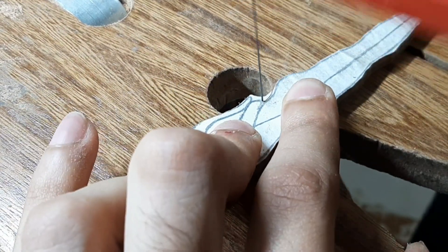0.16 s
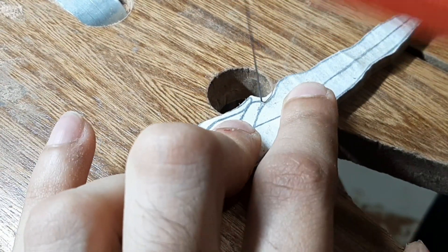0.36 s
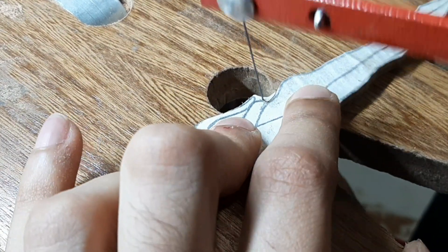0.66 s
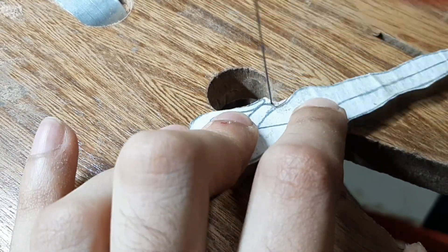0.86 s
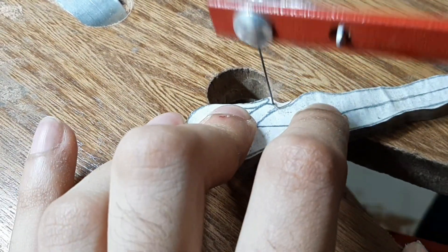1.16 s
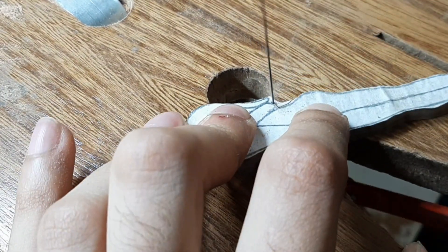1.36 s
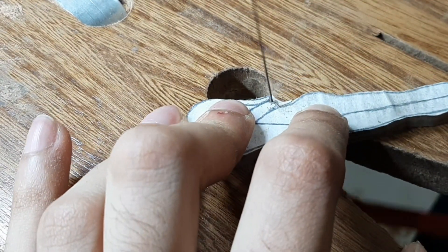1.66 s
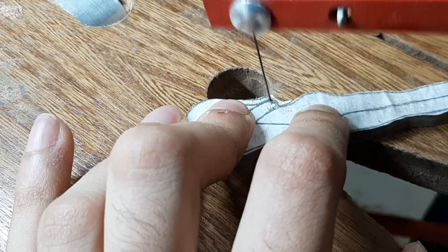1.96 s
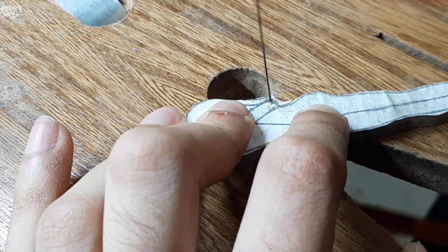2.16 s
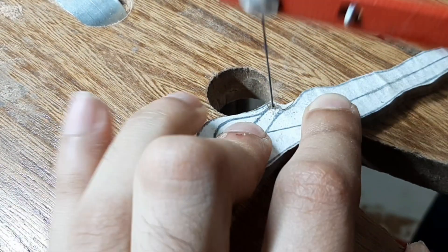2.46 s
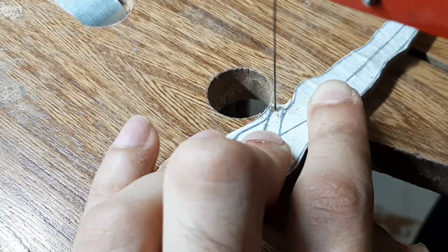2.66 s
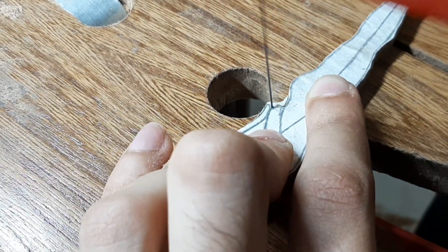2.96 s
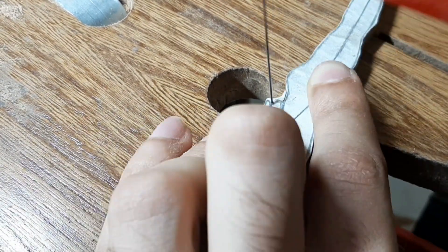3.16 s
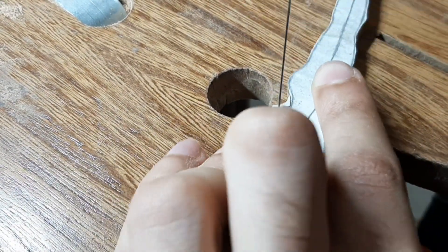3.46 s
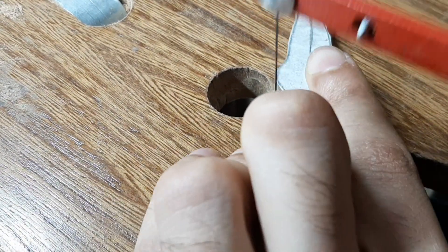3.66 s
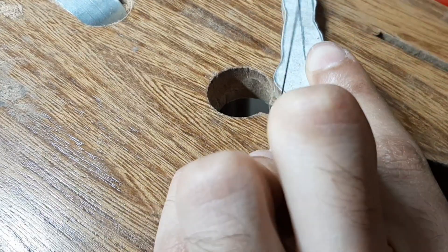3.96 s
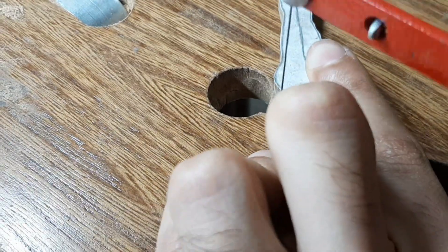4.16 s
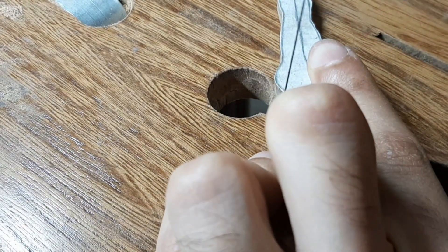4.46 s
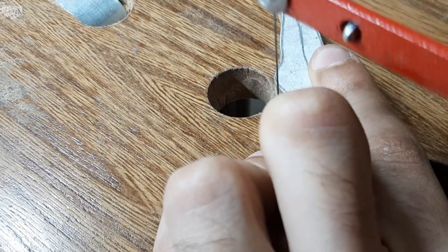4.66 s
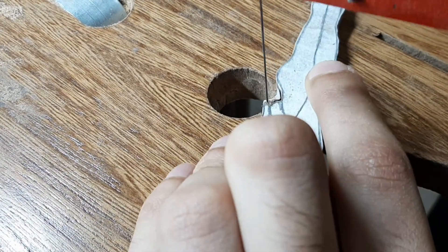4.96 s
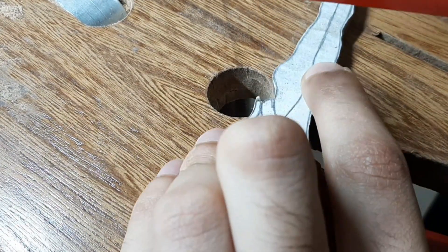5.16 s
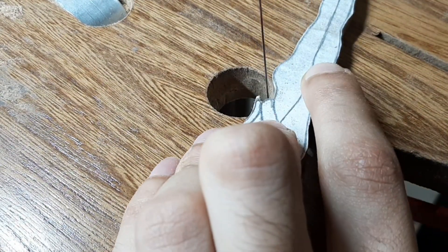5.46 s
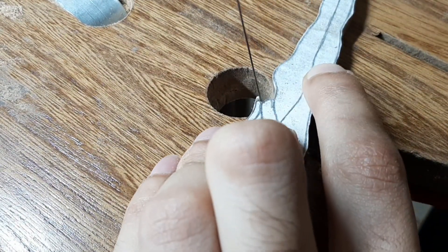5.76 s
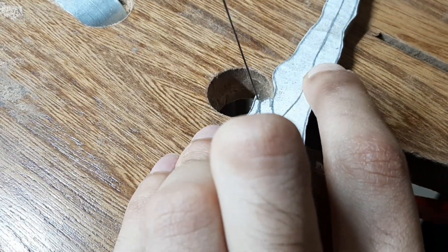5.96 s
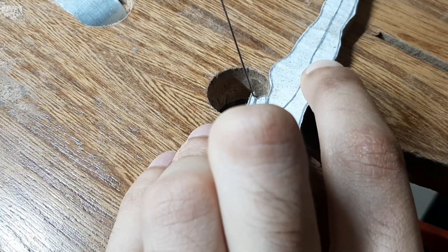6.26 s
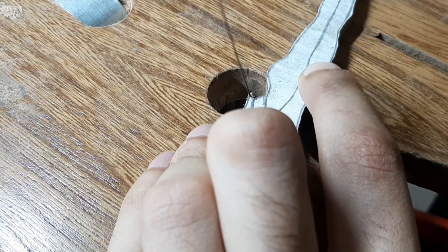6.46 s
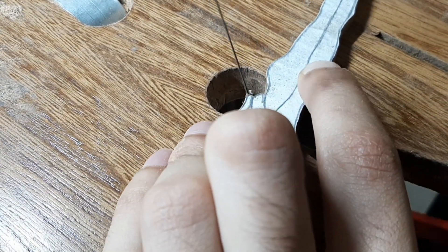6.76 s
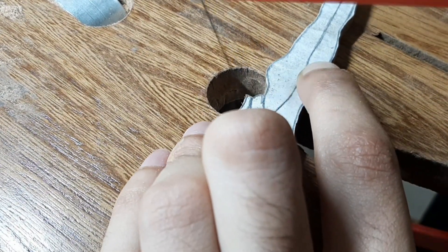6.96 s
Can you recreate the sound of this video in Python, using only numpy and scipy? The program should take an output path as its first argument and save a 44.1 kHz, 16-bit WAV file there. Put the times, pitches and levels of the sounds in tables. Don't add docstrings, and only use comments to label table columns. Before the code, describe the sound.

A fine hand saw rasps quickly through thin wood on a bench, with woody drumming, a few sharp knocks and near-silent pauses.

```python
import sys
import numpy as np
from scipy import signal
from scipy.fft import rfft, irfft, next_fast_len
from scipy.io import wavfile
from scipy.ndimage import uniform_filter1d

SR = 44100
rng = np.random.default_rng(int(sys.argv[2]) if len(sys.argv) > 2 else 0)


def voltage_ratio(decibels):
    exponent = np.asarray(decibels, float) / 20
    return 10 ** exponent


def pcm_store(signal):
    levels = np.round(np.clip(np.atleast_2d(signal), -1, 1) * 32767)
    wavfile.write(sys.argv[1], SR, levels.astype(np.int16).T)


N = 313992
T = np.arange(N) / SR

HOLDS = [
    0,
    1.04,
    2.4,
    5.5,
]
# (time [s], peak [dB], brightness [dB per octave], tail length [factor])
KNOCKS = [(0.162, -47, -6, 0.95), (1.064, -39.5, -4, 1), (1.838, -36, 4, 0.59), (1.962, -37.5, 3.5, 0.97),
          (2.837, -51, -1, 0.56), (3.35, -23, -1, 0.3), (3.514, -35, -2.5, 0.87), (5.117, -38, 1.5, 0.88),
          (5.149, -19, 3.5, 0.79), (5.804, -38.5, -1.5, 1), (6.396, -39, 21, 0.62), (7.072, -19, 6, 0.77)]


def evened(x):
    return x / np.sqrt(np.mean(x ** 2) + 1e-20)


def read(points, hz):
    f, value = np.transpose(points)
    return np.interp(np.log(hz + 1), np.log(f + 1), value)


def colour(x, points):
    size = next_fast_len(N)
    gain = voltage_ratio(read(points, np.fft.rfftfreq(size, 1 / SR)))
    return irfft(rfft(x, size) * gain, size)[..., :N]


def hold_at(times):
    return np.searchsorted(HOLDS, times, "right") - 1


def ring(x, modes, wander=0., step=.048):
    out, hold = np.zeros_like(x), hold_at(T)
    for hz, width, *db in modes:
        r, w = np.exp(-np.pi * width / SR), 2 * np.pi * hz / SR
        drift_db = wander * np.clip(rng.standard_normal(600), -2, 2)
        drift = np.interp(T, np.arange(600) * step, voltage_ratio(drift_db))
        gain = voltage_ratio(np.resize(db, len(HOLDS)))[hold] * drift
        out += gain * (1 - r) * signal.lfilter([1, 0, -1], [1, -2 * r * np.cos(w), r * r], x)
    return out


def add(mix, s, sound):
    part = mix[:, round(s * SR):][:, :sound.shape[1]]
    part += sound[:, :part.shape[1]]


def patches(shape, bins, frames):
    field = uniform_filter1d(uniform_filter1d(rng.standard_normal(shape), bins, 0), frames, 1)
    return evened(uniform_filter1d(field, bins, 0))


def hiss(floor_db=-90):
    return voltage_ratio(floor_db) * rng.standard_normal((2, N))


def shake_level(bite, db, follow, lag, press, column, slope):
    # (time [s], pressure [dB])
    pressing = [(0, 12.5), (.13, -19), (.33, 3.5), (.6, 1.5), (2.0, -1), (2.33, -4.5), (2.7, -10),
                (3.17, 2.5), (3.6, -2.5), (4.9, -1), (5.05, -7.5), (5.55, -14.5), (5.8, -3), (6.17, -17.5),
                (6.3, -3), (6.55, -2), (7.12, 11)]
    # (peak time [s], boom [dB], drumming [dB], swell [dB per s], fade [dB per s])
    shoves = [(0.209, -50, -43.5, 248, 128), (1.2, -47, -44.5, 122, 126.5), (2.72, -54.5, -61, 60, 400),
              (2.882, -50, -42.5, 281, 254), (3.359, -46, -34, 700, 113), (3.56, -51.5, -69, 72, 157),
              (4.83, -59, -55.5, 300, 117), (5.161, -38, -31.5, 599, 212.5), (5.75, -65.5, -82, 500, 500),
              (5.811, -50.5, -49.5, 798, 108), (6.4, -57, -59, 400, 132), (6.53, -50.5, -51, 150, 92),
              (6.89, -66, -54, 300, 102), (7.082, -37, -27, 704, 237)]
    keep = np.exp(-1 / (lag * SR))
    bite_db = 10 * np.log10(signal.lfilter([1 - keep], [1, -keep], bite) + 1e-13)
    press_db = press * np.interp(T, *np.transpose(pressing))
    power = voltage_ratio(2 * (db + follow * (bite_db + 45) + press_db))
    at = T.copy()
    for blow, *_ in KNOCKS:
        at[(T > blow - .03) & (T < blow)] = blow - .03
    for row in shoves:
        near = slice(max(round((row[0] - .3) * SR), 0), round((row[0] + .6) * SR))
        late = at[near] - row[0]
        fall_db = slope * np.where(late < 0, -row[3] * late, row[4] * late)
        power[near] += voltage_ratio(2 * (row[column] - fall_db))
    return np.sqrt(power)


def bench(bite, wide_db=-2.0, hollow_db=3.5):
    # (frequency [Hz], width [Hz], level [dB])
    boom_modes = [(108.5, 21, 0.5), (143.2, 7.5, 1.5), (224.7, 1.9, -0.5)]
    # (frequency [Hz], level [dB per Hz])
    wood = [(24, -60.5), (40, -45), (107, 2.5), (180, -9), (230, 11.5), (293, -26), (885, -7.5), (1190, -7),
            (1340, -5), (2290, -4), (2500, -16.5), (3250, -43.5), (5500, -120)]
    # (frequency [Hz], width [Hz], level [dB])
    hollow = [(400, 58, 6), (484, 35, 7.5), (601, 45, 4), (700, 89, 7.5), (764, 16, 4.5), (1023, 21, 11)]
    shake, rattle = rng.standard_normal((2, 2, N))
    boom = evened(ring(shake, boom_modes, wander=1.7))
    boom += voltage_ratio(wide_db) * evened(colour(shake, wood[:5] + [(400, -78.0)]))
    drum = evened(colour(rattle, [(200, -66.0)] + wood[4:]))
    drum += voltage_ratio(hollow_db) * evened(ring(rattle, hollow, wander=4.8))
    boom_level = shake_level(bite, -56, follow=0.35, lag=0.025, press=1, column=1, slope=0.56)
    drum_level = shake_level(bite, -60.5, follow=0.39, lag=0.006, press=0.73, column=2, slope=1)
    return boom_level * evened(boom) + drum_level * evened(drum)


def hums(width=92.0):
    # (time [s], level [dB], frequency [Hz])
    tracks = [
        [(4.38, -61.5, 1040), (4.54, -64.5, 985), (4.575, -45.5, 1090), (4.67, -66, 1020), (4.7, -55, 986),
         (4.83, -66, 1000), (5.02, -65, 1094)],
        [(5.86, -50, 458), (5.91, -60.5, 463), (5.96, -68, 419), (6.04, -59.5, 416), (6.14, -85, 444)],
    ]
    out, r = np.zeros((2, N)), np.exp(-np.pi * width / SR)
    for rows in tracks:
        s, db, hz = np.transpose(rows)
        t = np.arange(s[0], s[-1], 1 / SR)
        slow = signal.lfilter([1], [1, -2 * r, r * r], rng.standard_normal((2, 2, len(t))))
        turning = np.exp(2j * np.pi * np.cumsum(np.interp(t, s, hz)) / SR)
        tone = ((slow[0] + 1j * slow[1]) * turning).real
        level = voltage_ratio(np.interp(t, s, db) + 4.0) * signal.windows.tukey(len(t), .15)
        add(out, s[0], level * evened(tone))
    return out


def pings():
    # (time [s], peak [dB], time to fade by 60 dB [s])
    touches = [
        (5.6088, -55, 0.36),
        (5.653, -63.5, 0.097),
    ]
    # (frequency [Hz], width [Hz], level [dB])
    blade_modes = [(2730, 270, -32), (3690, 120, -1.5), (4670, 390, -22), (7220, 280, -1.5),
                   (10500, 290, -1.5)]
    out, t = np.zeros((2, N)), np.arange(SR // 4) / SR
    for s, db, t60 in touches:
        strength = (t < .006) + .5 * voltage_ratio(-60 * t / t60)
        add(out, s, voltage_ratio(db + 12) * rng.standard_normal((2, len(t))) * strength)
    return ring(out, blade_modes)


def snags(ping_t60=0.0025):
    # (time [s], peak [dB], pitch [Hz], rattle after it [dB], rattle time to fade by 60 dB [s])
    events = [
        (0.1165, -31, 9360, -21, 0.053),
        (1.024, -27.5, 5870, -47, 0.16),
        (3.1856, -62, 9700, -1, 0.13),
        (3.3484, -28.5, 10200, -10.5, 0.048),
        (3.366, -21, 5280, -30, 0.17),
        (3.517, -33.5, 4600, -18, 0.13),
        (4.994, -68, 9460, -22, 0.2),
        (5.1163, -16.5, 9700, -15.5, 0.21),
        (7.0116, -32, 5140, -10, 0.13),
    ]
    out, t = np.zeros((2, N)), np.arange(SR // 3) / SR
    for s, db, hz, rattle_db, rattle_t60 in events:
        noise = rng.standard_normal((2, len(t)))
        ping = signal.lfilter(*signal.iirpeak(hz, 4.0, SR), noise * voltage_ratio(-60 * t / ping_t60))
        fading = voltage_ratio(rattle_db - 60 * (t / rattle_t60) ** 1.38)
        rattle = signal.lfilter(*signal.iirpeak(hz, .6, SR), noise * fading)
        add(out, s, voltage_ratio(db) * (2.4 * ping + 1.43 * rattle))
    return out


def catches(boost_db=4.5, spread=1.8):
    # (time [s], peak [dB], frequency [Hz], length [s])
    swells = [(0.426, -46.5, 1232, 0.018), (0.427, -36, 2515, 0.016), (0.431, -54, 3760, 0.034),
              (0.56, -42, 2990, 0.016), (0.564, -51, 3870, 0.024), (0.686, -47, 2480, 0.025),
              (0.808, -45.5, 1227, 0.024), (0.817, -44, 3830, 0.016), (1.081, -48, 2493, 0.018),
              (1.199, -45, 714, 0.015), (1.205, -49, 2480, 0.022), (1.213, -45, 2990, 0.016),
              (1.339, -52, 1210, 0.029), (1.342, -43, 2880, 0.016), (1.348, -53, 3750, 0.029),
              (1.458, -43.5, 2480, 0.015), (1.464, -47, 4610, 0.015), (1.551, -45.5, 3830, 0.018),
              (1.59, -43.5, 2533, 0.016), (1.865, -49.5, 3950, 0.018), (2.362, -50, 2570, 0.015),
              (2.864, -46, 974, 0.018), (2.865, -78, 2570, 0.016), (2.891, -63, 2820, 0.02),
              (3.273, -51, 2540, 0.031), (3.336, -58, 2560, 0.036), (3.416, -41, 4590, 0.018),
              (3.432, -45, 1107, 0.027), (3.521, -46, 686, 0.015), (4.446, -51, 1900, 0.018),
              (4.447, -52, 5060, 0.024), (4.45, -43, 2990, 0.024), (4.56, -42, 2440, 0.015),
              (4.568, -51.5, 2150, 0.025), (4.693, -45, 2930, 0.015), (4.705, -56.5, 986, 0.036),
              (4.805, -49, 2526, 0.016), (4.814, -48.5, 2117, 0.016), (5.208, -44, 436, 0.06),
              (6.404, -55, 686, 0.027), (6.412, -48, 2240, 0.02), (6.415, -43.5, 3044, 0.02),
              (6.546, -40, 1525, 0.025), (6.548, -46, 2390, 0.02), (6.659, -44.5, 2390, 0.022),
              (6.891, -47, 2484, 0.016), (6.999, -53, 1214, 0.022), (7.0, -46, 3050, 0.018)]
    out = np.zeros((2, N))
    for (s, db, hz, length), phase in zip(swells, rng.random((len(swells), 2, 1))):
        t = np.arange(0, spread * length, 1 / SR)
        tone = np.hanning(len(t)) * np.sin(2 * np.pi * (hz * t + phase))
        add(out, s - t[-1] / 2, voltage_ratio(db + boost_db) * tone)
    return out


def knocks(plank_db=10.0, blow_db=-2.0, rise=0.00013):
    # (frequency [Hz], level [dB per Hz])
    blow_colour = [(35, -45), (60, -19), (390, -4.5), (895, -24.5), (1010, -9), (1330, -20), (2980, -12.5),
                   (5950, -35.5), (11600, -51), (15000, -55)]
    # (frequency [Hz], width [Hz], level [dB])
    plank = [(216, 16, 6.5), (704, 120, 7.5), (1000, 10, 2), (1152, 22, -5.5), (1350, 17, -14.5),
             (3080, 63, -12), (3720, 46, -10)]
    # (frequency [Hz], time to fade by 60 dB [s])
    shop = [(80, 0.35), (210, 0.38), (560, 0.5), (1470, 0.36), (3880, 0.19), (10200, 0.25)]
    out, t = np.zeros((2, N)), np.arange(SR // 2) / SR
    for s, db, bright_db, tail in KNOCKS:
        hz, frames, z = signal.stft(rng.standard_normal((2, len(t))), SR, nperseg=256)
        shape = read(blow_colour, hz) + bright_db * np.log2(hz / 1000 + 0.055)
        z *= voltage_ratio(shape[:, None] - 60 * frames / (tail * read(shop, hz))[:, None])
        sound = signal.istft(z, SR, nperseg=256)[1][:, :len(t)]
        sound *= (1 - np.exp(-t / rise)) * (1 + voltage_ratio(blow_db) * np.exp(-t / 0.0013))
        sound /= np.std(sound[:, :800])
        sound -= 4.0 * np.sin(2 * np.pi * 1300. * t) * np.exp(-t / .0004)
        add(out, s, voltage_ratio(db - 19.0) * sound)
    return out * 2.15 + voltage_ratio(plank_db) * ring(out, plank)


def struck(rise=0.00063):
    # (frequency [Hz], peak [dB], time to fade by 60 dB [s])
    blows = [
        (3.3495, [(226, -38.5, 0.36), (484, -44, 0.39), (700, -38, 0.12), (759, -29.5, 0.16), (1028, -35, 0.11), (1174, -34, 0.23), (1421, -45, .2), (2175, -47, .1)]),
        (3.514, [(674, -38, 0.08), (473, -37, .08), (1210, -49, 0.087)]),
        (5.1162, [(9600, -11, .011), (13400, -15, .008), (6800, -20, .008), (15000, -20, .006)]),
        (5.804, [(232.6, -46, 0.35), (592, -43.5, .1), (2390, -39, 0.045)]),
        (5.117, [(1180, -31, 0.21), (1520, -36, .15), (1890, -38, .15), (2690, -41, .1)]),
        (5.149, [(404, -40, 0.45), (692, -24.5, .09), (783, -27.5, 0.11), (1000, -30.5, 0.29), (1421, -46.5, 0.19), (1900, -36.5, .12), (2492, -43.5, 0.18), (3850, -43, 0.075)]),
        (7.0732, [(231, -30.5, 0.37), (600, -21.5, 0.11), (770, -34, 0.12), (1017, -43.5, 0.32), (2390, -28.5, 0.069), (2724, -20, 0.081), (2929, -12, 0.057), (3849, -40, .2)]),
    ]
    out, t = np.zeros((2, N)), np.arange(SR // 2) / SR
    for s, modes in blows:
        tone = sum(voltage_ratio(db - 60 * t / t60) * np.sin(2 * np.pi * hz * t) for hz, db, t60 in modes)
        add(out, s, np.outer([1, -1], tone * (1 - np.exp(-t / rise))))
    return out


def half_strokes():
    # (cut slows down over [s], return is fastest at [share of the cycle],
    # return speeds up over [share], rest at the turn [s], return ring [dB])
    grips = [
        (0.021, 0.76, 1, 0.0017, 7),
        (0.036, 0.87, 0.49, 0.0014, -0.5),
        (0.026, 0.73, 0.4, 0.0069, 0),
        (0.023, 0.87, 0.73, 0.0084, 5),
    ]
    # (time of top speed [s], bite
    # [dB], speeding up [s], slowing down [s], ring [dB])
    loose = [(2.805, -53, 0.03, 0.031, 1.5), (2.866, -45, 0.048, 0.047, 7.5),
             (2.95, -52.5, 0.027, 0.01, 1.5), (3.031, -52, 0.016, 0.023, 2),
             (3.101, -56.5, 0.028, 0.043, 3), (3.262, -44.5, 0.041, 0.037, 0),
             (3.349, -46.5, 0.052, 0.06, 6), (3.424, -30.5, 0.024, .021, -3),
             (3.523, -47, 0.051, 0.0045, 1.5), (3.54, -43.5, 0.0058, 0.046, -1),
             (3.648, -51.5, .057, 0.013, -4), (5.68, -83, 0.094, 0.059, 9.5),
             (5.797, -67, 0.015, 0.0061, 4), (5.883, -47, 0.04, 0.017, 6), (5.934, -57.5, 0.067, 0.02, 6.5),
             (6.001, -48.5, 0.038, 0.025, 5.5), (6.073, -68.5, 0.063, 0.026, 9.5),
             (6.217, -53.5, 0.039, 0.06, 3)]
    # (time the cut bites [s],
    # cut [dB], frame ring over fizz [dB], return [dB])
    even_cycles = [(-.09, -48, 0, -56), (0.041, -45.5, 5.5, -54.5), (0.164, -45, -3, -55),
                   (0.29, -39, 1, -54.5), (0.419, -36, 0.5, -51.5), (0.542, -38.5, 3.5, -50.5),
                   (0.667, -35, 5, -48.5), (0.796, -34.5, 0.5, -49.5), (.926, -39, -6, -51),
                   (1.058, -42.5, 2, -43.5), (1.192, -34.5, 1, -43.5), (1.319, -34.5, 0.5, -44),
                   (1.447, -36, 1, -44), (1.577, -38, 2.5, -43), (1.706, -36, -1, -44),
                   (1.839, -34, -1, -44.5), (1.967, -36, -2.5, -47.5), (2.092, -37.5, -2.5, -50.5),
                   (2.221, -41.5, -3, -57), (2.346, -45, -4, -47), (2.469, -46, -3, -53),
                   (2.595, -45.5, -1.5, -51.5),
                   (3.674, -42.5, -4, -50), (3.796, -42.5, -5, -47), (3.921, -40.5, -1.5, -47),
                   (4.077, -43.5, -1.5, -49), (4.191, -40, -2.5, -45.5), (4.311, -39.5, -1.5, -47),
                   (4.432, -38, 0, -45.5), (4.558, -35.5, -0.5, -46), (4.679, -38, -1, -47.5),
                   (4.805, -37.5, -1.5, -51.5), (4.925, -47, 1.5, -65.5), (6.265, -45, 2.5, -52.5),
                   (6.392, -42, 3, -48.5), (6.521, -40.5, 5, -51), (6.637, -40.5, -1, -52),
                   (6.751, -37, -1, -49), (6.878, -40, 1, -50), (6.993, -34, 3, -76)]
    cut_lengths = [1.01, 0.82, .75, 0.83, 0.72, 0.92, 1.35, 1.25, 0.88, 1.01, 0.86, 0.95, 0.99, 0.98, 0.87,
                   0.86, .9, 1.01, 0.86, 0.94, 0.83, 0.99, 0.9, 0.72, 1.06, .9, 0.76, 0.83, 1.05, .9, 1.2,
                   0.74, 0.98, 1.1, 1.3, 1.15, 1.06, 1.24, 1, 0.77]
    lead, peak_delay, longest_cycle = 0.011, 0.016, .137
    rows, bouts = list(loose), even_cycles
    starts = np.array([row[0] for row in bouts]) - lead
    cycles = np.minimum(np.diff(starts, append=99), longest_cycle)
    for (s, cut_db, ring_db, back_db), start, cycle, long in zip(bouts, starts, cycles, cut_lengths):
        fall, top, rise, rest, back_ring_db = grips[max(hold_at(s), 0)]
        peak = peak_delay * (1 + long) / 2
        rows.append((s + peak, cut_db, lead + peak, fall * long, ring_db))
        back_fall = max((1 - top) * cycle - rest, .004)
        rows.append((start + top * cycle, back_db, rise * cycle, back_fall, back_ring_db))
    return rows


def blade_power():
    bite, lean = np.zeros(N), np.zeros(N)
    for s, db, rise, fall, ring_db in half_strokes():
        span = slice(max(round((s - rise) * SR), 0), max(round((s + fall) * SR), 0))
        u = np.where(T[span] < s, (s - T[span]) / rise, (T[span] - s) / fall)
        bite[span] += voltage_ratio(2 * db) * (1 - u * u) ** 2
        lean[span] += voltage_ratio(2 * (db + ring_db)) * (1 - u * u) ** 2
    return bite, lean


def flexed(x):
    # (frequency [Hz], time shift [s])
    bends = [
        (7.9, .0001),
        (3.1, 0.00021),
        (17.3, 0.000046),
    ]
    at = T + sum(shift * np.sin(2 * np.pi * hz * T) for hz, shift in bends)
    return np.array([np.interp(at, T, row) for row in x])


def fizz(teeth, patchy_db=3.0):
    # (frequency [Hz], level [dB per Hz])
    colours = [
        [(1180, -28), (2000, -8), (2500, -15.5), (3330, -7.5), (3790, -14.5), (4090, -12), (5800, -17),
         (11100, -8), (15300, -16.5)],
        [(1180, -20.5), (2000, -6), (2520, -22.5), (3250, -6), (3790, -3.5), (4190, -13.5), (5000, -20),
         (5800, -20.5), (6600, -10), (9100, -3), (11400, -4.5), (12100, -23), (13000, -5.5), (15300, -10)],
        [(1180, -37.5), (2000, -7), (2930, -29), (3480, -14.5), (3820, -2.5), (6930, -5), (7880, -4),
         (9100, -2), (11700, -0.5), (15300, -10)],
        [(1180, -14), (2000, -18.5), (2980, -11.5), (3600, -20.5), (4690, -9.5), (7360, -13.5), (8800, -8.5),
         (10300, -10), (11300, -5.5), (15300, -22)],
    ]
    hz, frames, z = signal.stft(teeth, SR, nperseg=256)
    shapes = np.array([voltage_ratio(read(points, hz)) for points in colours])
    shapes /= np.linalg.norm(shapes, axis=1, keepdims=True)
    spots = voltage_ratio(patchy_db * patches(z.shape[1:], bins=3, frames=25))
    z *= shapes[hold_at(frames)].T * spots
    return evened(signal.istft(z, SR, nperseg=256)[1][:, :N])


def lingering(power, share=0.16, t60=0.26):
    keep = voltage_ratio(-2 * 60 / (t60 * SR))
    return np.sqrt(power + signal.lfilter([share * (1 - keep)], [1, -keep], power))


def saw(bite, lean, grain_db=1.5, clump_db=1.0, fizz_db=-2.0, frame_db=-4.5, shrill_db=-14.5):
    # (frequency [Hz], width [Hz], level in each of the four holds [dB])
    frame_modes = [(1209.5, 30, 1.5, -1.5, 3.2, 1), (1539, 27.6, -10.5, 2, 3, 1.5),
                   (1959, 64, -10.5, -21, 2, 3.5), (2175, 53, -16.5, -31, -0.5, -1.5),
                   (2494, 230, -1, -2, 3.5, 1), (2893, 240, -3.5, -1, 0, -1), (3798, 20, 5.5, 4.5, 6, 1),
                   (4600, 88, -3, -2, -1, 2)]
    # (frequency [Hz], width [Hz], level [dB])
    shrill_modes = [(8890, 390, 20.5), (10500, 42, -2.5)]
    bite, lean = lingering(bite), lingering(lean)
    grain_size = voltage_ratio(grain_db * np.minimum(rng.exponential(1, N), 4))
    teeth = evened(rng.standard_normal((2, N)) * grain_size)
    teeth *= voltage_ratio(clump_db * evened(uniform_filter1d(rng.standard_normal(N), size=60)))
    frame = flexed(ring(teeth * lean, frame_modes, wander=2.1, step=.014))
    frame /= np.std(ring(teeth[:1], frame_modes))
    shrill = bite * evened(ring(teeth, shrill_modes, wander=15.0))
    return voltage_ratio(fizz_db) * bite * fizz(teeth) + voltage_ratio(frame_db) * frame + voltage_ratio(shrill_db) * shrill


def ports(pair, sway=1.7, sway_hz=5000):
    # (frequency [Hz], phase [radians])
    port_phase = [(0, -3.5), (1210, 0.7743), (1890, 1.22), (2150, 6), (2500, 0.24), (3620, 3.5),
                  (5250, 15.5), (6630, 20), (7670, 22.5), (8700, 13), (10900, 10.5), (12100, 12.5),
                  (13700, 14.5), (16000, 18.5)]
    # (frequency [Hz], level [dB])
    port_db = [(60, 2), (240, 4.5), (950, 3), (3770, 1.5), (15000, 3)]
    # (frequency [Hz], likeness [0-1])
    port_same = [(40, 0.2), (100, 0.95), (900, 0.93), (2000, 0.7), (3400, 0.4), (5000, 0), (12000, 1)]
    hz, _, (a, b) = signal.stft(pair, SR, nperseg=512)
    same = np.clip(read(port_same, hz), 0, 1)[:, None]
    swaying = sway * (hz > sway_hz)[:, None] * patches(a.shape, bins=8, frames=60)
    lead = read(port_phase, hz)[:, None] + swaying
    right = same * a * np.exp(-1j * lead) + np.sqrt(1 - same ** 2) * b
    tilt = voltage_ratio(read(port_db, hz) / 2)[:, None]
    return signal.istft(np.array([a * tilt, right / tilt]), SR, nperseg=512)[1][:, :N]


def scene():
    # (time [s], left over right [dB])
    shift = [(0, 2), (.5, -1.7), (2.4, -1.5), (2.7, -1.5), (2.95, 1.5), (3.1, -2), (5.0, -1.9),
             (7.12, -2.7)]
    bite, lean = blade_power()
    background = hiss() + bench(bite) + hums() + pings()
    accents = snags() + catches() + knocks() + struck()
    pair = ports(background + accents + saw(bite, lean))
    return pair * voltage_ratio(np.outer([.5, -.5], np.interp(T, *np.transpose(shift))))


def gated(x, gate_db=-59, slope=0.54, depth_db=5, smooth_s=.02):
    power = abs(uniform_filter1d((x ** 2).mean(0), round(smooth_s * SR)))
    level_db = 10 * np.log10(power + 1e-14)
    return x * voltage_ratio(-np.clip(slope * (gate_db - level_db), 0, depth_db))


def top_cut(x):
    return signal.sosfilt(signal.butter(12, 16480, fs=SR, output="sos"), x)


def record(dry):
    low_cut = signal.sosfilt(signal.butter(3, 80., "high", fs=SR, output="sos"), dry)
    limited = signal.oaconvolve(low_cut, signal.firwin(255, 15600, fs=SR)[None], "same")
    return top_cut(gated(limited))


dry = scene()
out = record(dry)
pcm_store(out)
```